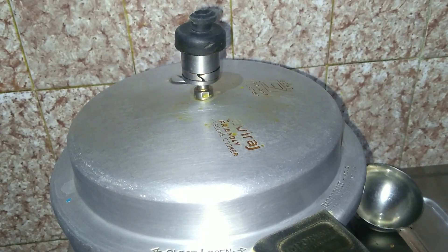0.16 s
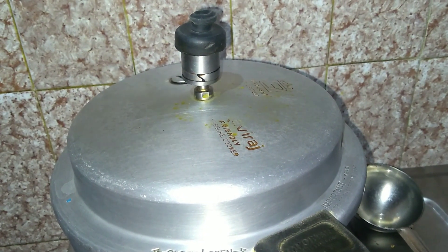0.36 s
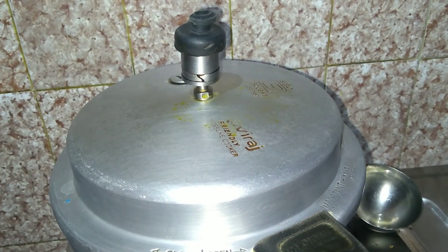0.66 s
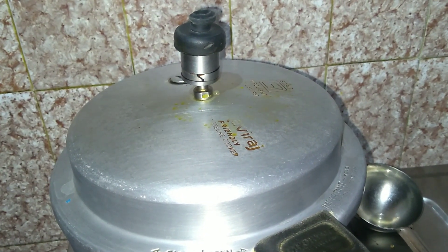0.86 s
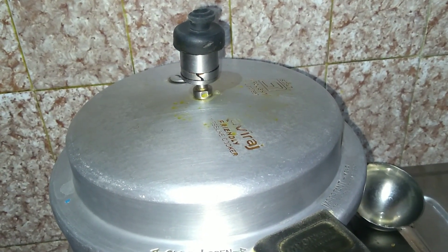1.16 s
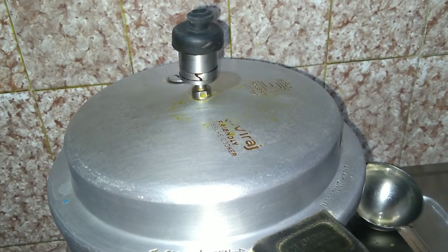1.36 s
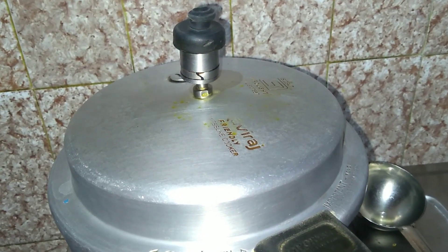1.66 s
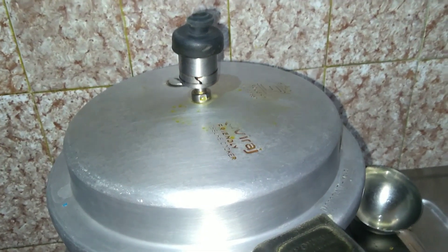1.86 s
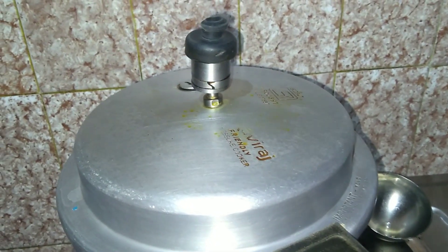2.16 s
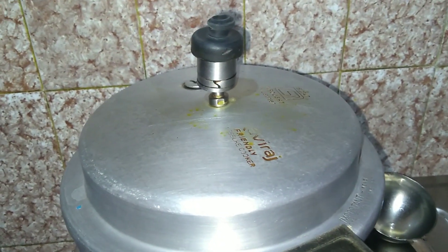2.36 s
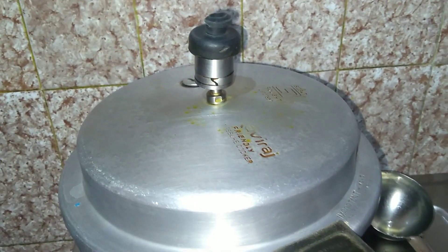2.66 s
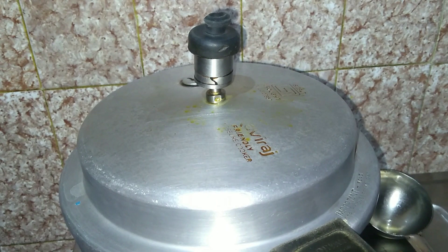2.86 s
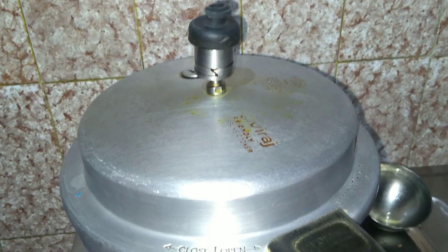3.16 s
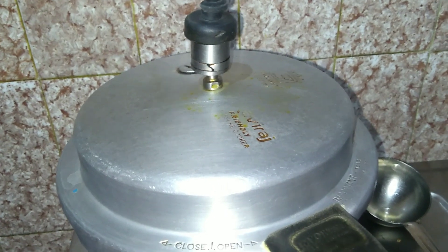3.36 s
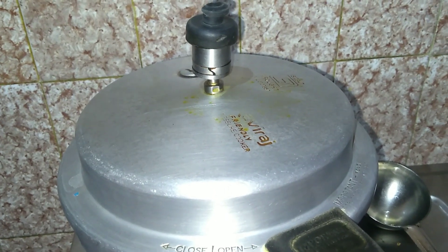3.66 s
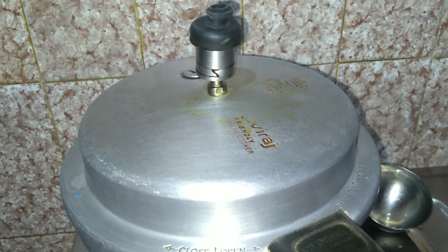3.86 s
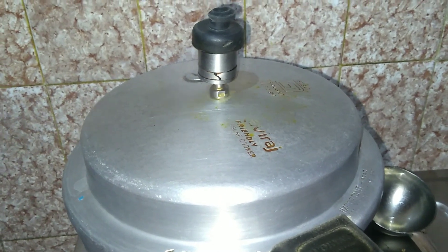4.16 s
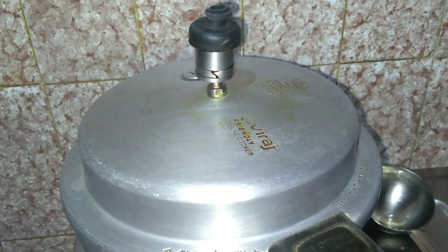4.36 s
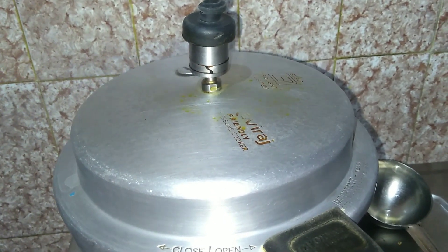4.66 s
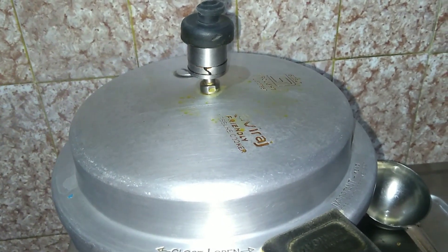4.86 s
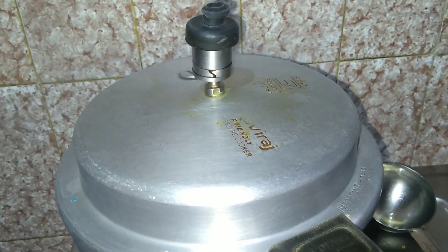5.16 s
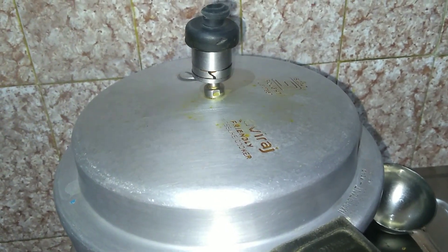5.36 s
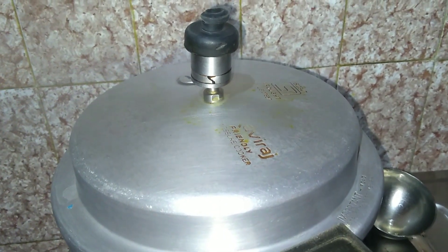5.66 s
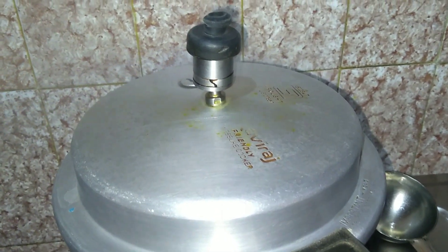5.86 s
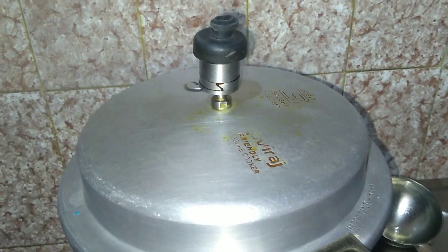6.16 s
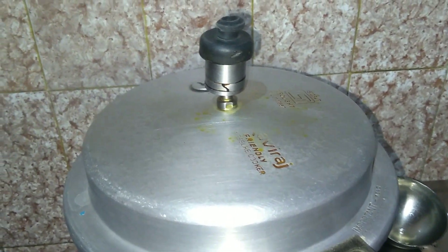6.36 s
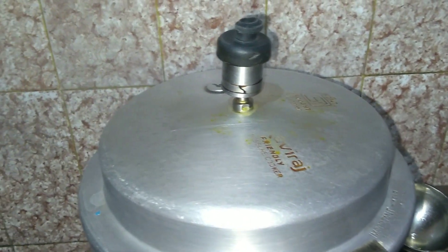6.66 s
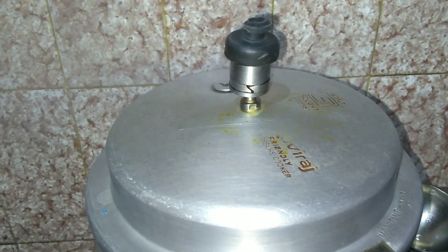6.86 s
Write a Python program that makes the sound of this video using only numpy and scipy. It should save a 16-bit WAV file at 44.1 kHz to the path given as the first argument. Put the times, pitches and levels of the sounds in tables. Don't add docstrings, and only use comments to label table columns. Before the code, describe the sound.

A pressure cooker on a kitchen stove releases steam in one loud, unbroken, airy hiss, already running at the start and still going at the end. Its strongest energy is high and sizzling, with a thinner body below. Brief soft dips come as the weight rocks, clustered just before three seconds. A very faint burner rumble lies underneath. Close handheld stereo, wide and diffuse, with short bright tile reflections.

```python
import sys
import numpy as np
from scipy import signal
from scipy.fft import rfft, irfft, next_fast_len
from scipy.io import wavfile
from scipy.ndimage import uniform_filter1d, map_coordinates

SR = 44100
rng = np.random.default_rng(int(sys.argv[2]) if len(sys.argv) > 2 else 0)


def unload_wav(signal):
    wavfile.write(
        sys.argv[1],
        SR,
        np.round(np.clip(np.atleast_2d(signal).T, -1, 1) * 32767).astype(np.int16),
    )


def boost(x):
    u = np.asarray(x, float) / 20
    return 10 ** u


N = 309141

# (frequency [Hz], density [dB per Hz])
JET_SPECTRUM = [(60, -36), (80, -16), (200, -19.5), (500, -19), (1300, -18), (2000, -12), (3000, -7),
                (4500, -2.5), (6000, -2), (7500, -3), (9500, -4.5), (12000, -7), (14000, -10.5),
                (15100, -8.5)]
# (frequency [Hz], width [Hz],
# level [dB])
SHARED_MODES = [(544, 17, -12.5), (690, 24, 1), (814, 44, -5), (941, 32, 4.0), (1008, 40, 2.5),
                (1104, 21, 2.5), (1310, 38, 1.5), (1256, 51, -5.5), (1340, 30, -6), (1534, 29, 5),
                (1585, 41, -7), (1660, 21, 5), (1887, 23, 5.5), (1940, 18, 4), (2230, 110, 3), (2390, 41, -16),
                (2780, 12, 3), (3520, 39, -6.7), (3280, 13, -4.5),
                (169, 32, 4), (434, 70, 0.5), (709, 10, 6.5)]
# (frequency [Hz], width [Hz], level at first hand position [dB], level at last [dB])
LEFT_PORT_MODES = [(1744, 100, 2.1, 2.3), (4844, 35, -4.1, -1.3), (4974, 35, -3.0, -0.6),
                   (5081, 60, 1.5, 4.1), (5211, 35, 3.3, 2.4), (5426, 35, 0.6, 2.9), (5598, 60, -2.9, -1.9),
                   (6093, 35, -1.7, -2.9), (6352, 35, -4.4, -0.4), (6524, 60, -0.9, -2.7),
                   (6739, 100, -0.7, 6.7), (6847, 35, 3.8, 4.0), (7105, 35, 0.5, 5.0),
                   (7213, 35, -1.6, -3.5), (7321, 60, -3.8, 1.2), (7665, 60, -4.2, -4.1),
                   (8074, 35, 1.7, -4.5), (8397, 35, 0.2, 3.7), (8591, 200, 4.1, 3.3),
                   (8914, 60, -1.2, 2.8), (9194, 100, 0.6, 2.9), (9345, 100, 3.8, 1.7),
                   (9517, 35, 4.0, -0.5), (10142, 200, -2.5, -1.2), (11261, 800, -0.6, -1.8),
                   (11670, 60, 0.1, 2.6), (12037, 60, 0.0, -2.8), (13199, 200, -1.6, -2.2),
                   (13931, 200, 1.6, 0.5), (14534, 100, -1.4, -1.9)]
RIGHT_PORT_MODES = [(1830, 200, -2.2, -1.9), (4069, 60, -2.6, -1.9), (4220, 60, -4.6, -2.8),
                    (5038, 60, 3.4, 5.1), (5124, 35, 3.6, 1.3), (5340, 60, -4.7, -3.5),
                    (5469, 35, 1.5, 3.2), (5598, 60, -2.7, -1.6), (5857, 35, 0.5, 5.4),
                    (6223, 35, 1.4, 3.3), (6373, 35, -2.9, -1.8), (6524, 60, -1.3, -4.5),
                    (6761, 60, -3.7, 2.3), (7105, 200, 1.4, 3.8), (7299, 35, 2.1, 4.3),
                    (7472, 100, 3.9, 1.9), (7687, 60, -1.2, -4.9), (7751, 35, -2.5, -2.0),
                    (8182, 400, -2.6, -2.9), (9000, 100, -2.3, -0.0), (9668, 60, 1.1, 2.7),
                    (9840, 100, 3.0, 1.0), (10745, 100, -0.9, -2.9), (11046, 35, -0.2, 3.9),
                    (11606, 200, 2.3, 3.9), (11843, 100, 2.7, -1.3), (13695, 200, 3.6, 1.6),
                    (13931, 100, 2.2, 0.7), (14513, 100, -3.5, -2.1), (14900, 35, -0.3, 3.4)]


def steam():
    def source(hz):
        spectrum = boost(along(JET_SPECTRUM, hz)[0])
        return arrivals(hz) * spectrum * port(SHARED_MODES, hz)

    def port_colours(hz):
        return np.array([port(LEFT_PORT_MODES, hz), port(RIGHT_PORT_MODES, hz)])

    jet = filtered(eddies(count=4, patchy_db=0.46), source).sum(axis=1)
    held = filtered(jet[:, None], port_colours)
    echoes = tiles(echo_db=-11, t60=.08, low_hz=2500)
    held = signal.fftconvolve(held, echoes[None], axes=2)[..., :N]
    moved = np.clip((np.arange(N) / SR - 1.5) / 4.2, 0, 1)
    jet = unit((1 - moved) * held[:, 0] + moved * held[:, 1])

    roar = filtered(jet, lambda hz: 1 / (1 + (hz / 2300) ** 4))
    fizz = filtered(jet, lambda hz: 1 - 1 / (1 + (hz / 9800) ** 6))
    hiss = jet - roar - fizz
    closed_db = throttle()
    progress = np.arange(N) / N - .5
    roar_drift_db, fizz_drift_db, steam_drift_db = -0.1, -1.2, -0.4
    roar_follows, fizz_follows = 1, 1.1
    roar_gain = boost(roar_drift_db * progress + (1 - roar_follows) * closed_db + 0.1 * wobble(14))
    fizz_gain = boost(fizz_drift_db * progress + (1 - fizz_follows) * closed_db + 0.1 * wobble(14))
    level = boost(-15.5 + steam_drift_db * progress - closed_db + 0.11 * wobble(14))
    return level * (hiss + roar_gain * roar + fizz_gain * fizz)


# (time [s], depth [dB])
WEIGHT_ROCKS = [
    (1.35, 1.6),
    (2.20, 2.5),
    (2.74, 1.5),
    (2.84, 2.5),
    (2.99, 2),
    (3.97, 2),
    (4.70, 1.5),
    (5.43, 1.5),
    (6.98, 1.5),
]


def throttle():
    close_s, reopen_s = 0.039, 0.047
    t = np.arange(N) / SR
    closed_db = np.zeros(N)
    for centre, depth_db in WEIGHT_ROCKS:
        duration = np.where(t < centre, close_s, reopen_s)
        closed_db += depth_db * np.exp(-((t - centre) / duration) ** 2)
    return closed_db


def eddies(count, patchy_db):
    z = signal.stft(rng.standard_normal((count, N)), nperseg=512)[2]
    field = uniform_filter1d(rng.standard_normal(z.shape[1:]), size=4, axis=0)
    field = uniform_filter1d(field, size=16, axis=1)
    return signal.istft(z * boost(patchy_db * unit(field)), nperseg=512)[1][:, :N]


# (frequency [Hz], straight path [0-1], off the wall [0-1])
PATH_SHARES = [(500, .47, .5), (1600, .42, .55), (2700, .5, .48), (3600, .52, .44), (4400, .55, .22),
               (5200, .73, .12), (7000, .73, .1), (9300, .66, .12), (10500, .34, .05), (13000, .3, .03),
               (15000, .42, .02)]


def arrivals(hz):
    straight_lag, wall_lead = 19.93 / SR, 18.6 / SR
    straight, wall = np.clip(along(PATH_SHARES, hz), 0, 1)
    room = np.sqrt(np.clip(1 - straight - wall, 1e-4, 1))

    def late(seconds):
        return np.exp(-2j * np.pi * hz * seconds)

    left = [np.sqrt(straight), np.sqrt(wall) * late(wall_lead), room, 0 * hz]
    right = [np.sqrt(straight) * late(straight_lag), np.sqrt(wall), 0 * hz, room]
    return np.array([left, right])


def port(modes, hz):
    levels_db = 0
    for centre, width, *db in modes:
        levels_db = levels_db + np.outer(db, 1 / (1 + (2 * (hz - centre) / width) ** 2))
    return boost(levels_db)


def tiles(echo_db, t60, low_hz):
    t = np.arange(1, 2048) / SR
    tails = rng.standard_normal((2, len(t))) * boost(-60 * t / t60)
    high_pass = signal.butter(4, low_hz, "high", fs=SR, output="sos")
    bright = signal.sosfilt(high_pass, tails)
    return np.hstack([np.ones((2, 1)), boost(echo_db) * bright / np.linalg.norm(tails[0])])


# (frequency [Hz], density [dB per Hz])
FLAME_SPECTRUM = [(25, -30), (60, 16), (100, 21), (200, 10), (350, 3), (700, -36)]


def burner():
    def flame_noise():
        return unit(filtered(rng.standard_normal(N), lambda hz: boost(along(FLAME_SPECTRUM, hz)[0])))

    rumble, draught = flame_noise(), flame_noise()
    settled = 1 - np.exp(-np.arange(N) / SR / 2.5)
    lean = boost(-19 + 5 * wobble(11)) * draught
    level_db = -47.5 - 16 * settled + 2.2 * wobble(2.4) + 1.2 * wobble(1.37)
    return boost(level_db) * (rumble + np.array([lean, -lean]))


def scene():
    return steam() + burner()


def unit(x):
    return x / np.sqrt(np.mean(x ** 2) + 1e-20)


def along(points, hz):
    f, *cols = np.transpose(points)
    return [np.interp(np.log(hz + 1), np.log(f + 1), c) for c in cols]


def wobble(rate):
    knots = rng.standard_normal(int(N * rate / SR) + 4)
    return map_coordinates(knots, [np.arange(N) * rate / SR])


def filtered(x, response):
    m = next_fast_len(N + SR // 4)
    return irfft(rfft(x, m) * response(np.fft.rfftfreq(m, 1 / SR)), m)[..., :N]


# (frequency [Hz], width [Hz], level [dB])
SUM_COLOUR = [(127, 200, -4), (338, 28, 7.5), (2190, 260, -3.5), (2660, 88, 2.5), (3200, 530, -1),
              (3740, 590, 2.23), (4440, 180, 2.5), (6700, 1000, 2.5), (8950, 670, 4.5),
              (15350, 360, -12)]
DIFFERENCE_COLOUR = [(480, 350, -6.5), (730, 180, -8), (1030, 250, -14), (3060, 100, 3),
                     (3330, 240, -7), (3570, 120, 4), (5600, 500, 3.5), (6300, 1500, 1),
                     (7900, 500, 2.5), (10300, 400, 1.5), (15000, 300, 1.5), (15330, 250, -10)]


def colour_sum_difference(pair):
    def lifts_and_dips(hz):
        return np.vstack([port(SUM_COLOUR, hz), port(DIFFERENCE_COLOUR, hz)])

    coloured = filtered(pair, lifts_and_dips)
    unsteady = np.array([wobble(11), wobble(11)])
    leak = np.clip(0.1 + 0.28 * unsteady, -.2, 1)
    return coloured + leak * (pair - coloured)


def band_limit(x):
    return signal.sosfilt(signal.butter(12, 15500, fs=SR, output="sos"), x)


def record(dry):
    left, right = dry * np.array([[1], [-1]])
    pair = colour_sum_difference(np.array([left + right, left - right]) / 2)
    top_hz = np.array([[15150], [15470]])
    pair = filtered(pair, lambda hz: (hz < top_hz) / (1 + (60 / (hz + 1)) ** 4))
    mix = np.array([pair[0] + pair[1], pair[0] - pair[1]])
    return band_limit(mix)


dry = scene()
out = record(dry)
unload_wav(out)
```